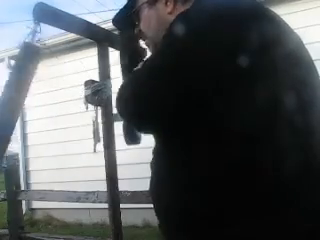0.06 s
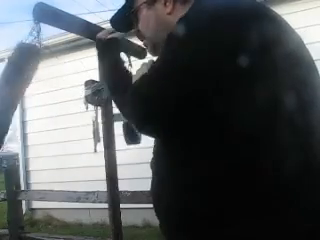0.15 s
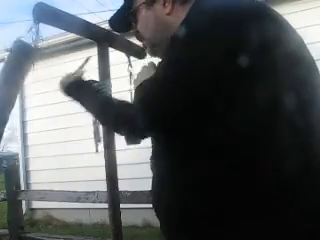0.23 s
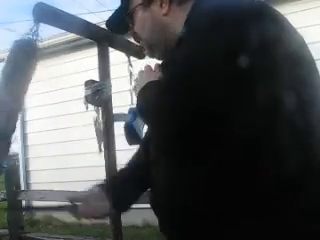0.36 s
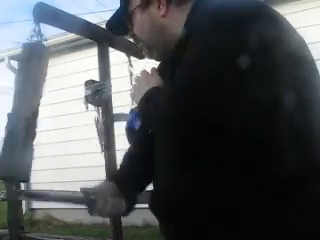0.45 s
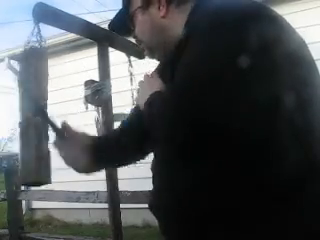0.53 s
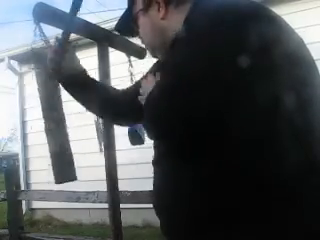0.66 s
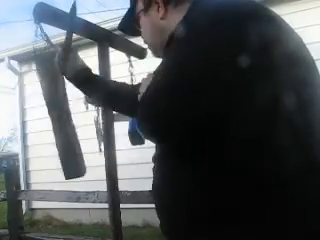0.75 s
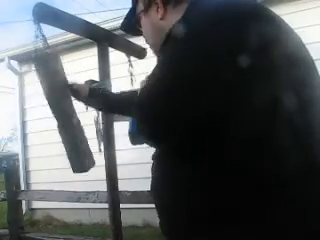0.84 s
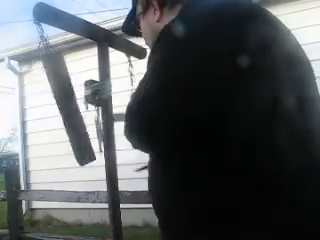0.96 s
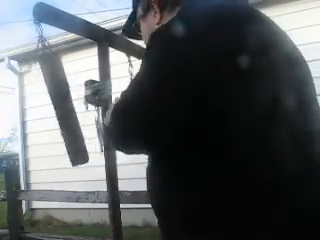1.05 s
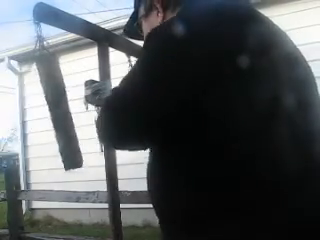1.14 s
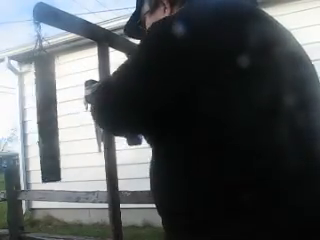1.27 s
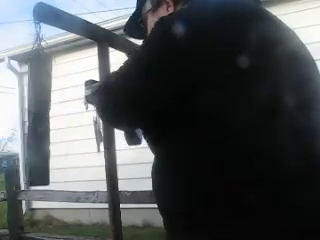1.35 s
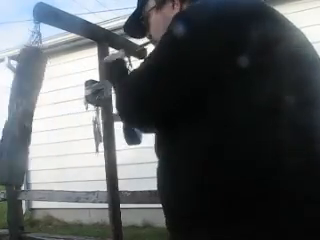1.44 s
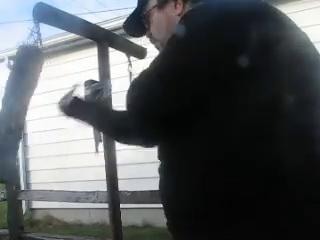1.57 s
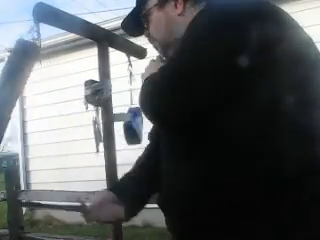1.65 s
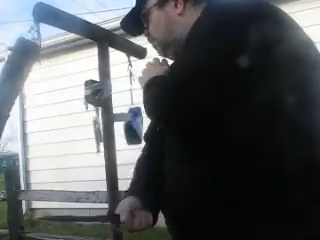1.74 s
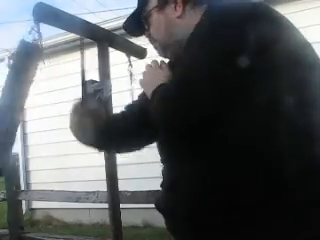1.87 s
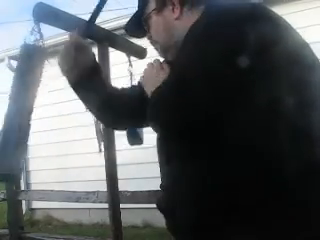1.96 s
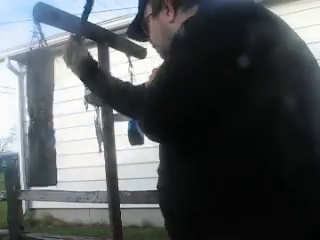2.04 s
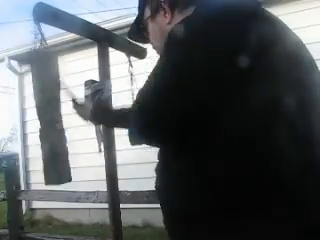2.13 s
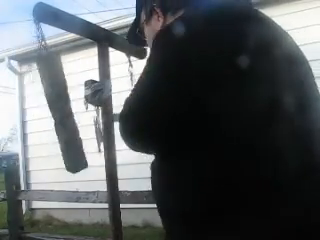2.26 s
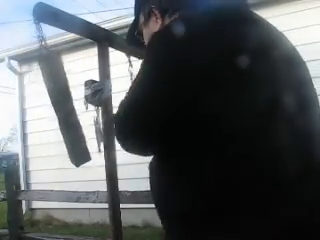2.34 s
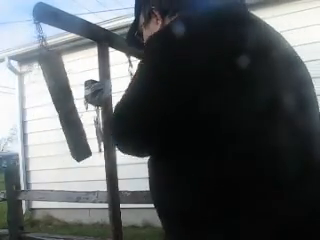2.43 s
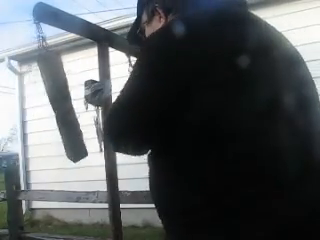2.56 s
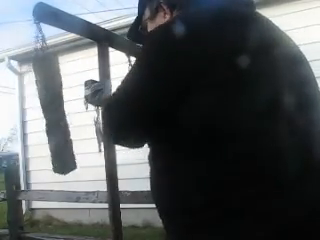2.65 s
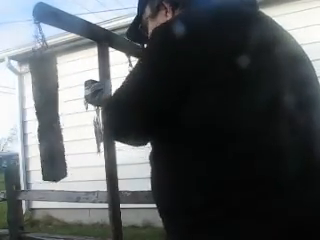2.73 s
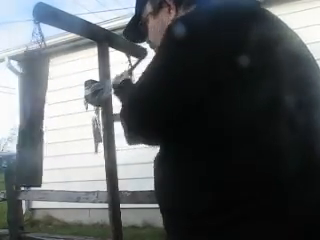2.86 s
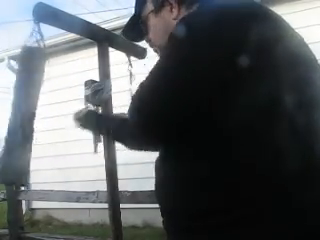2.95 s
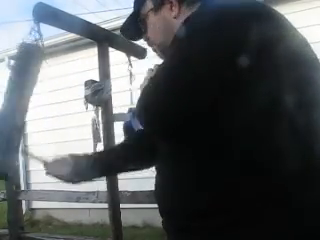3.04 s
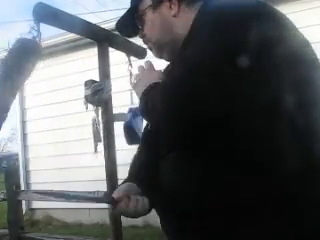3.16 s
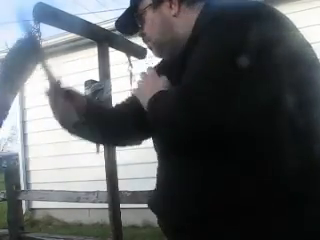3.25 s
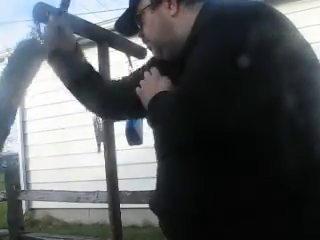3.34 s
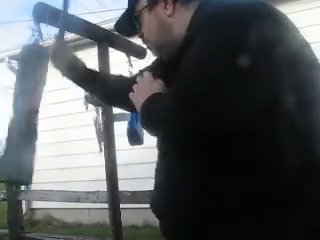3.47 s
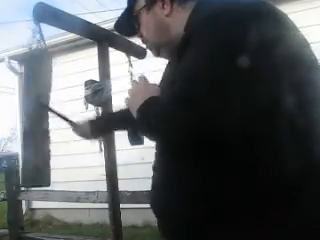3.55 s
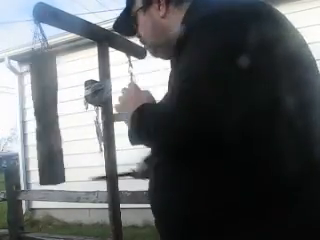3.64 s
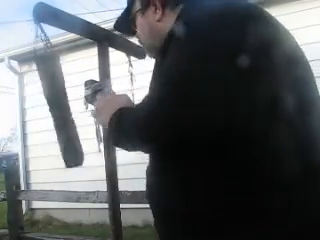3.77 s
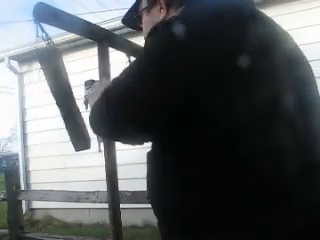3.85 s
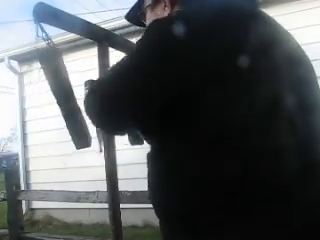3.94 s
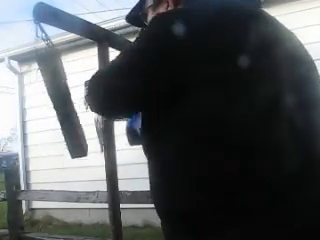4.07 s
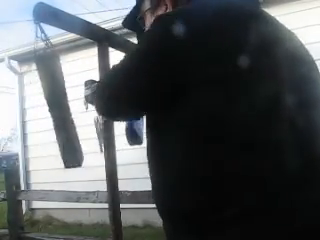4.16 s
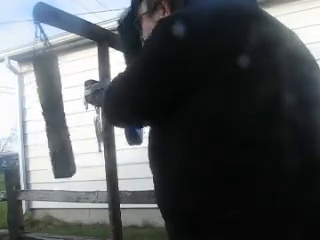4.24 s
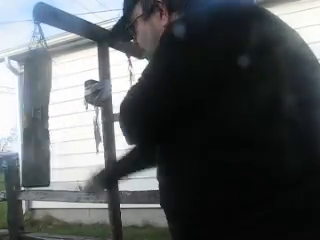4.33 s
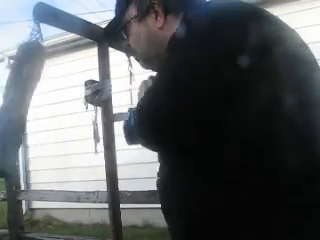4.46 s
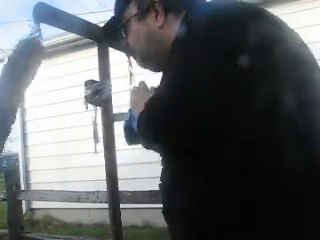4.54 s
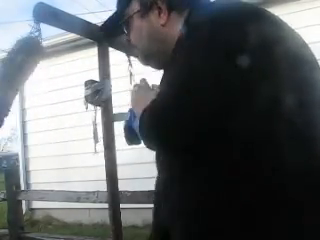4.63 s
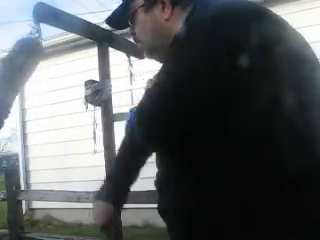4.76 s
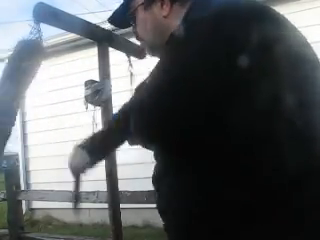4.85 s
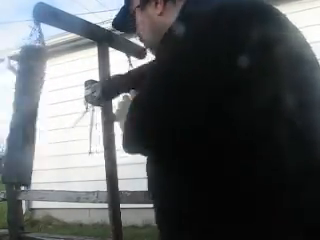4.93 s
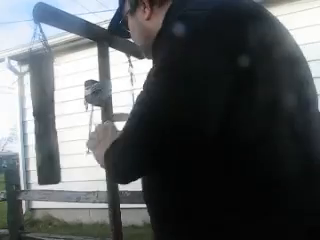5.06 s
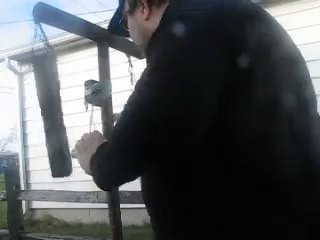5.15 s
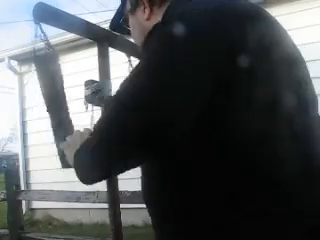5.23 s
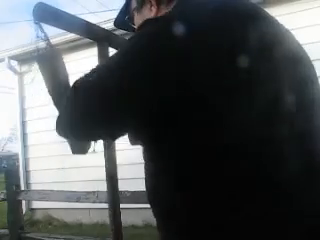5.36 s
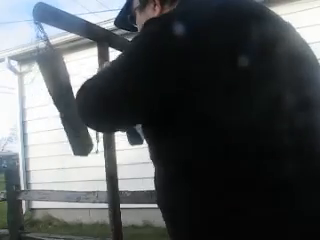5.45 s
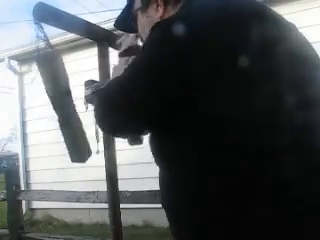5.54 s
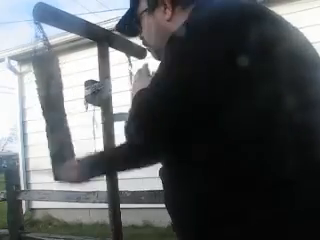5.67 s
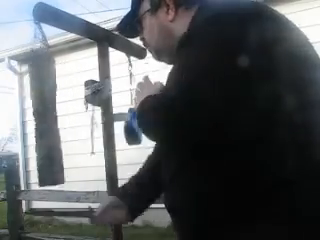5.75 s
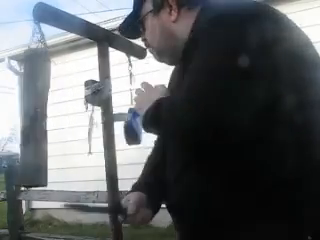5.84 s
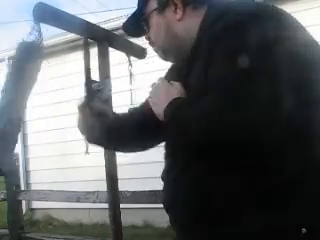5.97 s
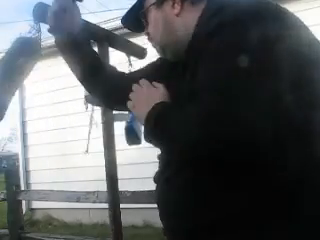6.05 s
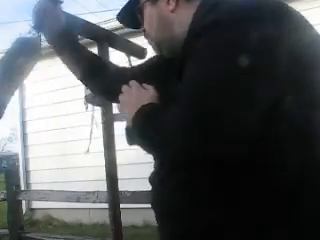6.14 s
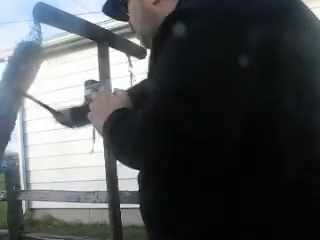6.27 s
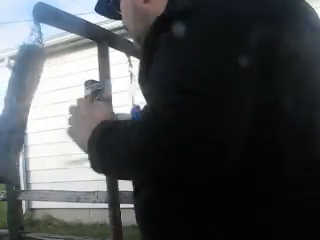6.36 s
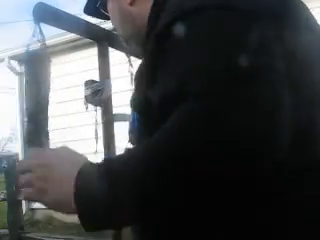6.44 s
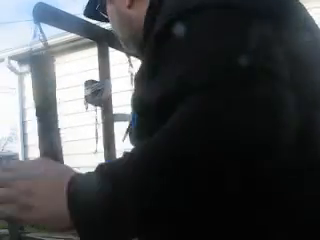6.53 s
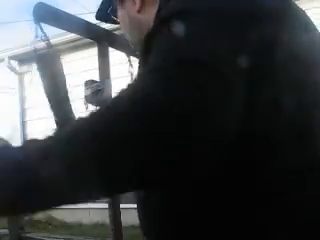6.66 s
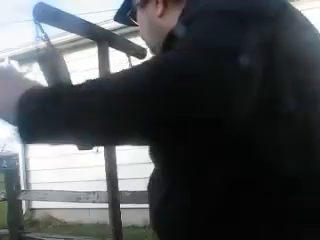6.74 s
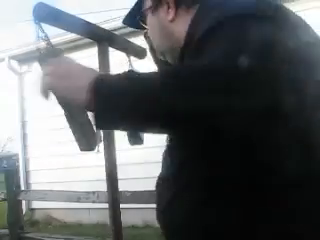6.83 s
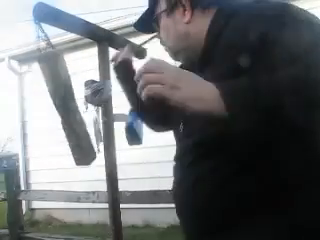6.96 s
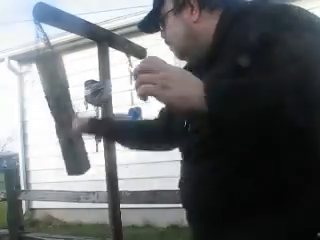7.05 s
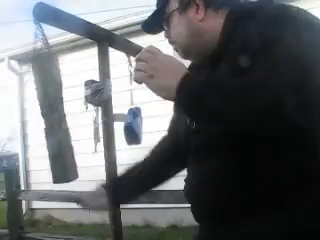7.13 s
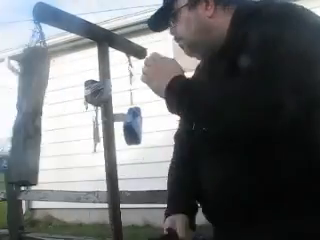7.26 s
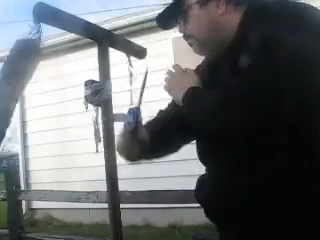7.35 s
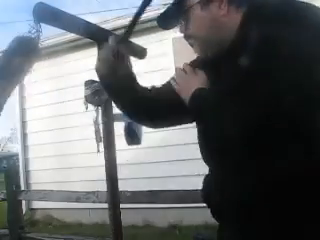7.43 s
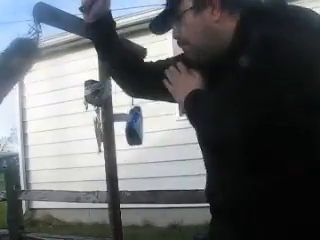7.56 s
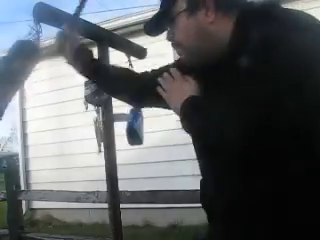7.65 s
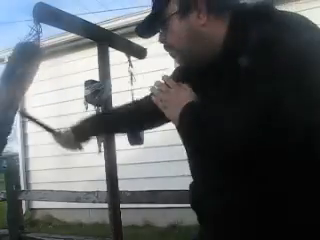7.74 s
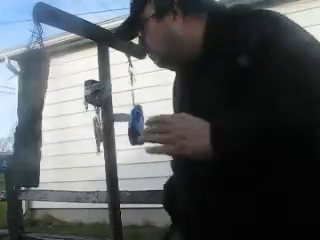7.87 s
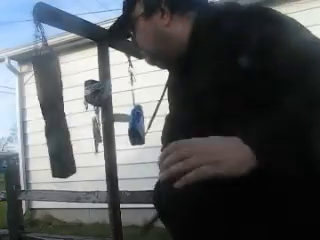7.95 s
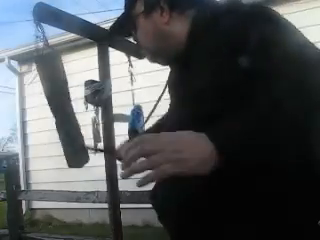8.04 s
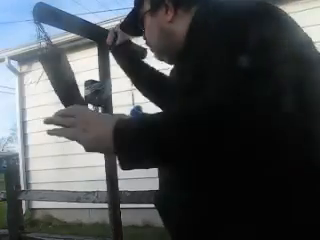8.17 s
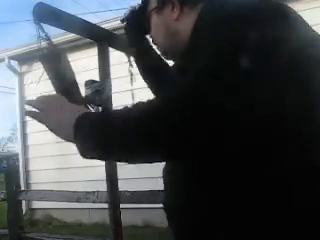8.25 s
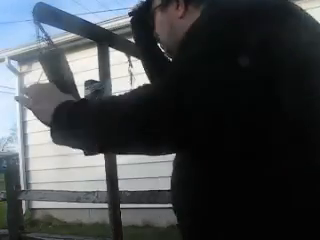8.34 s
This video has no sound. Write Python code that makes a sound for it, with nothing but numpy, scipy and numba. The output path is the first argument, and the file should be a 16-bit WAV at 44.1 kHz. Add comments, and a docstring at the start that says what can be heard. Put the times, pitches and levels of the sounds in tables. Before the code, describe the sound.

A steel blade chops a hanging wooden post outdoors in sharp, cracking, irregular knocks, with chain links ticking and a jacket rustling over low rumble.

```python
"""A chain link ticks and a jacket rustles, then from 0.26 s a steel blade chops a square post hung on a chain.
Each blow cracks and rings the post; contacts and bounces are shaped noise plus decaying wood modes.
Between blows links tick and ring as short noise and bright modes; late on, dull foot and body bumps join in.
Throughout, a house wall, fence and ground return a noise tail over town rumble, hiss and a faint camera whine.
The camera clips the hardest blows softly and pulls its gain down after them, most of all in the bass."""
import sys
import numpy as np
from scipy import signal
from scipy.fft import rfft, irfft
from scipy.io import wavfile
from scipy.ndimage import uniform_filter1d
from numba import njit

SR = 44100
rng = np.random.default_rng(int(sys.argv[2]) if len(sys.argv) > 2 else 0)


def file_out(sig):
    """Save sig as 16-bit WAV at sys.argv[1]."""
    # one column per channel
    cols = np.atleast_2d(sig).T
    # limit, then scale
    lim = np.clip(cols, -1, 1)
    pcm = np.round(lim * 32767).astype(np.int16)
    wavfile.write(sys.argv[1], SR, pcm)


N = 370428  # length in samples

# All levels and pans below are mix settings ahead of the camera's gain control.
# Blade contacts, bounces included. Each row: start in seconds, blow level in dB, post pitch in Hz,
# post ring, overtones, thud and knock each in dB from the blow level, crack tilt in dB per octave,
# contact time in ms, ring length factor.
BLADE_CONTACTS = [(0.261, -3, 891, -28, -32, -9, -2.5, -4, 1.36, 1.1),
                  (0.2847, -34, 930, -11, -22, -14, -9, 12, 2.5, 0.9),
                  (0.5219, -12.5, 880, -55, -41, -41, -11, 0, 2.2, 0.98),
                  (0.8494, -16.5, 896, -46, -15, -5, -9, 13.5, 12.4, 0.92),
                  (0.8512, -3, 911, -29, -25, -11.5, 4.5, 0.5, 1.57, 1.3),
                  (1.5652, -4.5, 899, -26, -13.5, -30, 3, 1.5, 3.2, 1.2),
                  (1.5794, -9, 877, -19, -18, -18, -9, 1, 2.3, 2.1),
                  (1.5937, -1.5, 876, -27, -37, -30, -15, -0.5, 5.5, 1.35),
                  (2.1576, 1, 863, -31, -27, -20.5, -13, 1.5, 1.55, 0.78),
                  (2.1834, -16.5, 897, -25, -16, -28, -7, 4.5, 6, 1.3),
                  (2.5402, -7.5, 826, -45, -25.5, -29, -9, -9, 3.9, 1.2),
                  (2.9696, -4.5, 933, -21.5, -17, -11, 4.5, 0, 2.1, 1.2),
                  (2.9832, -16, 887, -13, -3, -25, 2.5, -3, 2.3, 1.07),
                  (2.9945, -9.5, 869, -27, -24, -22, -9, 5.5, 1.7, 2.4),
                  (3.0036, -6, 945, -31.5, -21, -30, 4.5, -3, 3.9, 1.04),
                  (3.5245, -1, 890, -18.5, -20, -7, 0.5, 2.5, 1.93, 1.05),
                  (3.5477, -12, 894, -9.5, -35, -9, -23, 9, 3.8, 0.83),
                  (4.3031, 0.5, 835, -35, -20, -20, -1, 0.5, 2.9, 0.83),
                  (4.3294, -28, 896, -10, -3, -16, 3, -6, 5, 1.46),
                  (4.8604, -8.5, 864, -19, -8.5, -5.5, 5, 5.5, 1.1, 0.39),
                  (4.8794, -23.5, 881, -7.5, -40, -13, -4, 1.5, 2.1, 0.88),
                  (5.2397, -8.5, 905, -32.5, -21, -29, 0.5, -4, 1.36, 0.56),
                  (5.622, 3.5, 911, -36.5, -33.5, -29, -7, -3, 2.37, 1.8),
                  (5.6544, -29.5, 869, -6, -22, -24, 3, -2.5, 2.5, 1.8),
                  (6.2535, 6, 912.5, -9.5, -19, -19, -4, -6, 1.2, 0.82),
                  (6.2684, -12.5, 864, -12, -16, 2.5, -9, -5, 3.6, 3.7),
                  (6.2899, -4, 890, -21, -16, -28, 3, 0.5, 1.9, 1.46),
                  (7.0716, -1, 925, -32.5, -28, -26, -7.5, 3.5, 5, 0.99),
                  (7.0878, -5.5, 872, -26, -36, -46, -4.5, 4.5, 6.3, 0.98),
                  (7.7233, -5.5, 907, -19, -46, -7.5, -10.5, 8, 2.9, 1.3),
                  (7.7444, -30, 892, -1.5, -30, -10, -5, 1.5, 2.2, 0.67),
                  (8.083, -15.5, 912, -23, -31, -24, 1.5, -1, 0.85, 0.9),
                  (8.1005, -18.5, 899, -5.5, -36, -2.5, -10, 4, 0.53, 1.1),
                  (8.219, -14, 910, -41, -33, -8, -3, -7, 4, 1.1),
                  (8.2243, -5.5, 1007, -35, -34, -16, -1.5, 0.5, 3.2, 1.2),
                  (8.2494, -14.5, 832, -23, -26, -5, 1, -1.5, 1, 0.89)]
# The louder knocks of chain links. Each row: start in seconds, level in dB, colour in Hz,
# post ring in dB from that level, left minus right in dB.
LINK_TICKS = [(0.0468, -26, 7100, -39, 1), (0.1481, -23, 2010, -27, 1), (0.3411, -12, 2030, -25, 2),
              (0.3894, -29.5, 1750, -8, 0), (0.5756, -26, 4350, -35, 7), (0.5874, -27, 7850, -37, -8),
              (0.6574, -30.5, 3630, -26, 6), (0.7108, -25.5, 6900, -29.5, 10.5),
              (0.7696, -30.5, 5900, -33, 10), (1.0111, -24, 2750, -17, -4), (1.1338, -32, 7300, -35, -7),
              (1.2526, -28, 7800, -38, 7), (1.8407, -26.5, 6130, -70, -4), (2.9277, -24.5, 4200, -27, -2),
              (3.0654, -27, 2470, -15, 6), (3.1702, -20.5, 3200, -27, -3), (3.687, -21, 6700, -40, -3),
              (3.705, -11.5, 5030, -30.5, -2), (3.8137, -31.5, 6600, -35, -37.5),
              (3.9973, -28, 7400, -28, -5), (4.5544, -28, 3620, -18, 8), (4.6808, -29, 7400, -19, -2),
              (4.7194, -34, 2880, -10, 1), (4.9377, -11, 7750, -29, -1), (4.9871, -15.5, 2600, -26, -3.5),
              (5.1123, -27, 7200, -61, 10), (5.3323, -23.5, 7050, -30, -18), (5.88, -28, 6400, -30, -32),
              (5.9863, -29.5, 6740, -38, -32), (6.5051, -26, 1800, -13, -3), (6.6268, -19.5, 6900, -32, 0),
              (6.6727, -11, 2020, -27.5, 5.5), (6.762, -24.5, 5900, -18, -3), (6.9118, -22, 7340, -28, 1.5),
              (6.989, -17, 4800, -47, -2), (7.311, -27, 2900, -16, -3), (7.453, -15.5, 7100, -28, 0),
              (7.6256, -29, 6750, -27, -2), (7.9284, -21.5, 3500, -23, -2), (8.0202, -22.5, 6800, -38, -7),
              (8.0481, -13, 5100, -44, 1), (8.2824, -24, 7490, -24, 6), (8.2934, -21, 2980, -10, 2)]
# Links left free to ring. Each row: start in seconds, level in dB, pitch in Hz of the links shaken most.
LINK_RINGS = [(0.148, -43, 1900), (0.343, -29.5, 1790), (0.656, -53, 3650), (0.659, -38, 1400),
              (3.221, -40, 1900), (3.689, -43, 3100), (3.707, -43, 3800), (3.713, -39.5, 1400),
              (5.245, -44, 1400), (8.101, -14.5, 7450)]
# Dull bumps of feet and body. Each row: start in seconds, level in dB, pitch in Hz.
BODY_BUMPS = [(5.962, -19.5, 664), (6.737, -48, 300), (6.779, -28, 268), (6.836, -12, 306),
              (6.862, -14.5, 274), (6.909, -21, 276), (6.995, -29, 315), (7.96, -24, 350),
              (8.224, -16.5, 226), (8.258, -17, 227), (8.314, -12.5, 457)]
# Low modes of the post; the first is the blow's own dead knock.
# Each row: multiple of the post pitch, level in dB, t60 in seconds before the ring length factor.
POST_LOW_MODES = [(1.0, 6, 0.059), (.965, -14.5, 0.47), (1.003, -1, 0.22), (1.035, -10.5, 0.33)]
# Post overtones. Each row: pitch in Hz, level in dB, t60 in seconds before the ring length factor.
POST_OVERTONES = [(1790, -6, .04), (1870, -2, .06), (2080, -10, .04), (2250, -8, .05), (2415, -2, .12),
                  (2475, -1, .1), (2570, -4, .08), (2700, -7, .08)]
# Bands of the crack. Each row: centre in Hz, width in Hz, level in dB before the blow's tilt.
CRACK_BANDS = [(4180, 1600, 3), (7165, 2570, 8.5), (14200, 6600, -2.5)]
# Chain modes. Each row: pitch in Hz, level in dB, t60 in seconds.
LINK_MODES = [(1400, 0, .22), (1880, 0, .08), (3025, 0, .9), (3140, -4, .8), (3220, -5, .7), (3456, -2, .5),
              (3623, -2, .45), (4307, -3, .4), (7450, 0, .16)]
# Port balance for sound from post and chain. Each row: frequency in Hz, left minus right in dB.
PORT_BALANCE = [(60, 20), (110, -15), (200, -1.0), (380, 3), (700, 0), (1290, -2.5), (2380, -5), (4400, 3),
                (8120, -1.5), (15000, 5)]
# Bands of jacket cloth. Each row: centre in Hz, width in Hz, relative level in dB.
CLOTH_BANDS = [(836, 1190, 5.5), (2460, 1200, -2.5), (4800, 1000, -8), (5550, 5000, 9), (7450, 920, 6),
               (9300, 3200, -22.5), (14000, 1300, -10.5)]
# Arm swings rubbing the jacket. Each row: middle in seconds, level in dB, half length in seconds.
ARM_SWINGS = [(0.103, -51.5, 0.17), (0.418, -48, 0.2), (0.953, -45, 0.19), (4.705, -51, 0.35),
              (4.955, -35.5, 0.03), (5.105, -48, 0.057), (5.398, -42, 0.096), (5.531, -34, 0.043),
              (5.882, -37.5, 0.028), (5.982, -35, 0.04), (6.117, -51, 0.07), (6.535, -43, 0.44),
              (6.875, -56, 0.14), (7.013, -37, 0.031), (7.374, -50, 0.12), (7.668, -38.5, 0.077),
              (8.133, -38, 0.13), (8.231, -28.5, 0.024), (8.358, -31.5, 0.058)]
# Low resonances of the town. Each row: centre in Hz, width in Hz, relative level in dB.
RUMBLE_BANDS = [(59.8, 21, -4), (130.2, 48, -0.5), (198, 87, -7), (295.6, 94, -3), (447, 340, -7.5)]
# Rumble fader. Each row: time in seconds, level in dB.
RUMBLE_LEVELS = [(0.0, -47), (0.42, -40.5), (1.0, -43), (1.5, -47), (2.0, -48), (2.8, -44.5), (3.4, -45.5),
                 (4.2, -48.5), (5.0, -40.5), (5.5, -42), (6.1, -44.5), (6.5, -39.5), (7.0, -37), (7.2, -59),
                 (7.4, -39), (7.95, -48.5), (8.24, -36), (8.4, -34)]
# Colour of the hiss. Each row: frequency in Hz, relative level in dB per Hz.
HISS_COLOUR = [(200, -9), (300, -5), (520, -5), (2100, -8), (5000, -12), (7600, -8.5), (8600, -11.5),
               (9300, -16.5), (14400, -22.5), (15700, -26), (16500, -56)]
# Camera whine. Each row: pitch in Hz, level in dB rms about which it wavers.
WHINE_TONES = [(8221, -68), (8251, -54.5), (8280, -65)]

TILT_HZ = 5000  # the crack's tilt turns about this
THUD_HZ, THUD_WIDTH_HZ = 517, 530
KNOCK_HZ, KNOCK_WIDTH_HZ = 2600, 1400
CHOP_PAN_DB, JACKET_PAN_DB = -1, -3  # left minus right
SPLINTER_DB = -28.5  # crackle against the bite, before its random bursts
POST_BLUR_HZ, LINK_BLUR_HZ = 10.2, 14.0  # line width from wandering phase
TICK_TREBLE_DB = -16
FAINT_TICKS = 30  # scattered at random
FAINT_DB, FAINT_SPREAD_DB, FAINT_RING_DB, FAINT_PAN_DB = -34, 2, -28, -4
FAINT_LOW_HZ, FAINT_HIGH_HZ = 2480, 7800  # range of their colour; most lie near the top
LINK_FALL_DB = 150  # loss one octave from the shaken pitch, growing with the square
RIGHT_LAG_S = .000034
HISS_DB = -46.5
BASS_HZ, BASS_DUCK = 450, 0.66  # below this the gain control cuts deeper by this share
TOP_HZ = 16300


def undb(db):
    """Decibels to gain."""
    return 10 ** (np.asarray(db) / 20)


def unit(x):
    """Scale to rms 1."""
    return x / np.sqrt(np.mean(x ** 2))


def peak(x, db):
    """Scale to a peak level."""
    return x * undb(db) / np.max(np.abs(x))


def band(x, hz, width):
    """Band-pass around a centre."""
    edges = [max(hz - width / 2, 20), min(hz + width / 2, .49 * SR)]
    return signal.sosfilt(signal.butter(2, edges, "bandpass", fs=SR, output="sos"), x)


def fade(t, t60):
    """Exponential decay, down 60 dB at t60."""
    return np.exp(-np.log(1000) * t / max(t60, .001))


def walk(rate):
    """Slow random wander of rms 1: held random steps at this rate per second, smoothed twice."""
    k = int(SR / rate)
    steps = np.repeat(rng.standard_normal(N // k + 1), k)
    return unit(uniform_filter1d(uniform_filter1d(steps, k), k)[:N])


def wide(like):
    """Stereo noise whose two sides correlate by the given share."""
    mid, side = rng.standard_normal((2, N))
    like = np.clip(like, 0, 1)
    return np.sqrt((1 + like) / 2) * mid + np.sqrt((1 - like) / 2) * side * np.array([[1], [-1]])


def pan(db):
    """Left and right gains from left minus right in dB."""
    return undb(np.array([[db], [-db]]) / 2)


def add(out, s, x, pan_db=0):
    """Place a sound in time and between left and right."""
    i = int(s * SR)
    out[:, i:i + len(x)] += pan(pan_db) * x[:N - i]


def ring(t, hz, modes, rise_s, stretch=1, spread_db=4.5, detune=0.0042, blur_hz=0):
    """Decaying modes that start together, with chance level and pitch each time and a wandering phase."""
    luck = rng.standard_normal((len(modes), 2))
    steps = rng.standard_normal((len(modes), len(t)))
    wander = np.sqrt(2 * np.pi * max(blur_hz, 0) / SR) * np.cumsum(steps, axis=1)
    total = np.zeros(len(t))
    for (multiple, db, t60), (level_luck, pitch_luck), phase in zip(modes, luck, wander):
        pitch = multiple * hz * (1 + detune * pitch_luck)
        level = undb(db + spread_db * level_luck)
        total += level * fade(t, t60 * stretch) * np.sin(2 * np.pi * pitch * t + phase)
    return total * (1 - np.exp(-t / rise_s))


def chops():
    """Blade contacts: a ragged noise burst of splitting fibres, thud and knock bands, and post modes."""
    out, t = np.zeros((2, N)), np.arange(SR // 2) / SR
    for s, db, hz, ring_db, over_db, thud_db, knock_db, tilt_db, ms, stretch in BLADE_CONTACTS:
        contact_s = max(ms, .5) / 1000
        # the blade bites for a moment, then splinters crackle on
        bite = np.exp(-(t / contact_s) ** 3)
        crackle = undb(2.0 * rng.exponential(size=len(t) // 50).repeat(50))
        splinters = undb(SPLINTER_DB) * crackle * fade(t, 0.17)
        burst = np.minimum(t / 0.0011, 1) * (bite + splinters) * rng.standard_normal(len(t))
        crack = sum(peak(band(burst, f, w), d + tilt_db * np.log2(f / TILT_HZ)) for f, w, d in CRACK_BANDS)
        thud = peak(band(burst, THUD_HZ, THUD_WIDTH_HZ), thud_db)
        knock = peak(band(burst, KNOCK_HZ, KNOCK_WIDTH_HZ), knock_db)
        low = undb(ring_db) * ring(t, hz, POST_LOW_MODES, 0.0004, stretch, blur_hz=POST_BLUR_HZ)
        # each overtone is drawn a little off pitch at random, more loosely than the low modes' detuning
        high = undb(over_db) * ring(t, 1, POST_OVERTONES, .0003, stretch, 3.5, .01, 2 * POST_BLUR_HZ)
        add(out, s, undb(db) * (crack + thud + knock + low + high), CHOP_PAN_DB)
    return out


def faint_ticks():
    """Rows for quiet link ticks at random moments, in the form of the louder ones."""
    even, bell = rng.random((FAINT_TICKS, 2)), rng.standard_normal((FAINT_TICKS, 2))
    rows = []
    for (when, colour), (level, place) in zip(even, bell):
        hz = FAINT_LOW_HZ + (FAINT_HIGH_HZ - FAINT_LOW_HZ) * np.sqrt(colour)
        db = FAINT_DB + FAINT_SPREAD_DB * level
        rows.append((when * (N - 1) / SR, db, hz, FAINT_RING_DB, FAINT_PAN_DB + 1.2 * place))
    return rows


def chain_ticks():
    """Links knocking: short bright noise in three bands, each nudging the post into a ring."""
    out, t = np.zeros((2, N)), np.arange(SR // 4) / SR
    for s, db, hz, ring_db, pan_db in LINK_TICKS + faint_ticks():
        burst = (fade(t, .012) + undb(-24) * fade(t, .06)) * rng.standard_normal(len(t))
        tick = peak(band(burst, hz, 0.29 * hz), -7)
        tick += peak(band(burst, 5900, 5900), -0.45)
        tick += peak(band(burst, 10100, 4700), TICK_TREBLE_DB)
        # the nudge leaves out the dead knock
        nudge = undb(ring_db) * ring(t, 905, POST_LOW_MODES[1:], 0.0006, 0.7, blur_hz=POST_BLUR_HZ)
        add(out, s, undb(db) * (tick + nudge), pan_db)
    return out


def chain_rings():
    """Free links ringing: metal modes weighted towards the shaken pitch, doubled 1.2 percent higher."""
    out, t = np.zeros((2, N)), np.arange(SR // 2) / SR
    for s, db, hz in LINK_RINGS:
        shaken = [(f, db + d - LINK_FALL_DB * np.log2(f / hz) ** 2, t60) for f, d, t60 in LINK_MODES]
        for detuned in (1, 1.012):
            add(out, s, ring(t, detuned, shaken, 0.0058, blur_hz=LINK_BLUR_HZ))
    return out


def ports(x):
    """Each microphone port colours the sound its own way, and the right one hears it a moment later."""
    hz, side = np.fft.rfftfreq(N, 1 / SR), np.array([[.5], [-.5]])
    at_hz, db = np.transpose(PORT_BALANCE)
    balance = undb(side * np.interp(np.log(hz + 1), np.log(at_hz), db))
    lag = np.exp(2j * np.pi * hz * RIGHT_LAG_S * side)
    return irfft(rfft(x) * balance * lag, N)


def echoes(near):
    """Scattered returns from wall, fence and ground: a decaying noise tail whose treble dies first."""
    t = np.arange(SR // 3) / SR
    noise = rng.standard_normal((2, len(t))) * (1 - np.exp(-(t / 0.00067) ** 2))
    body = band(noise, 2010, 3770) * fade(t, 0.18)
    treble = undb(-1.5) * band(noise, 11600, 5600) * fade(t, 0.1)
    return undb(-56.5) * signal.fftconvolve(near, unit(body + treble), axes=1)[:, :N]


def bumps():
    """Feet and body: soft low pushes, each three quickly damped modes."""
    out, t = np.zeros((2, N)), np.arange(SR // 4) / SR
    for s, db, hz in BODY_BUMPS:
        modes = [(1, db - 7.0, 0.051), (1.39, db - 12, 0.031), (0.507, db - 22.5, 0.15)]
        add(out, s, ring(t, hz, modes, 0.0015))
    return out


def jacket():
    """Cloth slipping in dense tiny noise grains during each swing; each band flickers alone."""
    t = np.arange(N) / SR
    swing = sum(undb(db) * np.exp(-((t - s) / half_s) ** 2 / 2) for s, db, half_s in ARM_SWINGS)
    grain_db = np.minimum(2.2 * rng.exponential(size=N // 40 + 1), 9).repeat(40)[:N]
    grains = undb(grain_db + 1.2 * walk(40))
    cloth = sum(undb(d + 1.3 * walk(17)) * unit(band(wide(0.34) * grains, f, w)) for f, w, d in CLOTH_BANDS)
    return unit(cloth) * swing * pan(JACKET_PAN_DB)


def town_rumble():
    """Distant traffic: nearly mono noise in a few low resonances that swell together and waver alone."""
    swell = 0.88 * walk(4.47)
    rumble = sum(undb(d + swell + walk(7.9)) * unit(band(wide(0.99), f, w)) for f, w, d in RUMBLE_BANDS)
    level_db = np.interp(np.arange(N) / SR, *np.transpose(RUMBLE_LEVELS))
    return unit(rumble) * undb(level_db) * pan(-1)


def hiss():
    """A steady bed of wide coloured noise with a slight waver in level."""
    hz, db = np.transpose(HISS_COLOUR)
    colour = undb(np.interp(np.log(np.fft.rfftfreq(N, 1 / SR) + 1), np.log(hz), db))
    return unit(irfft(rfft(wide(.3)) * colour, N)) * undb(HISS_DB + .7 * walk(5))


def camera_whine():
    """Thin high sines, slightly unsteady in level and phase."""
    t = np.arange(N) / SR
    whine = np.zeros(N)
    for f, d in WHINE_TONES:
        level = undb(d + walk(15)) * np.sqrt(2)
        whine += level * np.sin(2 * np.pi * f * t + .3 * walk(10))
    return whine


def scene():
    """Post, chain and man close by, over the yard's background."""
    near = chops() + chain_ticks() + chain_rings()
    background = town_rumble() + hiss() + camera_whine()
    return ports(near) + echoes(near) + bumps() + jacket() + background


@njit
def follow(x, up, down):
    """Follower with separate rates for rising and falling."""
    y, e = np.empty(len(x)), 0.
    for i in range(len(x)):
        e += (x[i] - e) * (up if x[i] > e else down)
        y[i] = e
    return y


def record(dry):
    """Soft clipping, a gain control that sinks after loud blows and creeps back, and a steep top cut."""
    clipped = .8 * np.tanh(dry / .8)
    loud = follow(np.abs(clipped).max(axis=0), 1 / (0.02 * SR), 1 / (.06 * SR))
    # cut about a third of a dB for each dB above -38 dB
    cut_db = .33 * np.maximum(20 * np.log10(loud + 1e-6) + 38, 0)
    cut_db = follow(cut_db, 1 / (0.0074 * SR), 1 / (.15 * SR))
    bass = signal.sosfiltfilt(signal.butter(2, BASS_HZ, fs=SR, output="sos"), clipped)
    ducked = clipped - bass * (1 - undb(-BASS_DUCK * cut_db))
    top_cut = signal.ellip(8, .2, 70, TOP_HZ, fs=SR, output="sos")
    return signal.sosfilt(top_cut, ducked * undb(-cut_db))


dry = scene()
out = record(dry)
file_out(out)
```